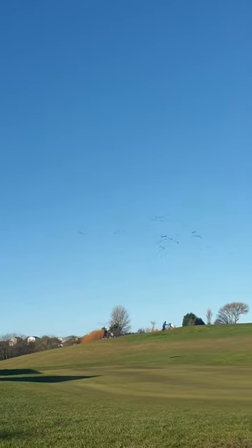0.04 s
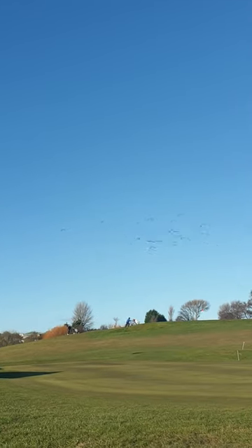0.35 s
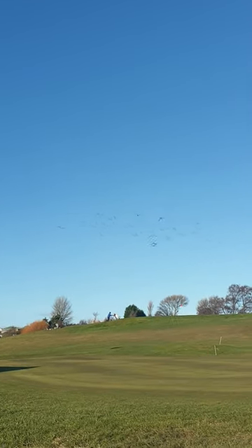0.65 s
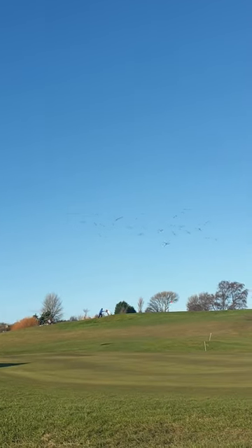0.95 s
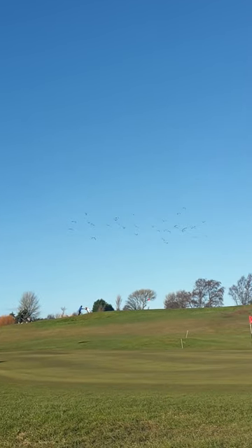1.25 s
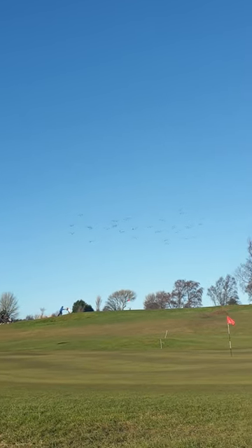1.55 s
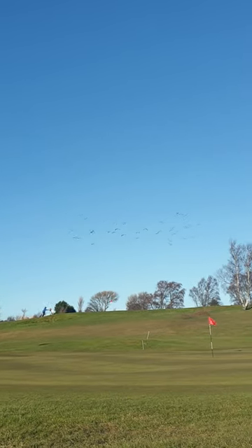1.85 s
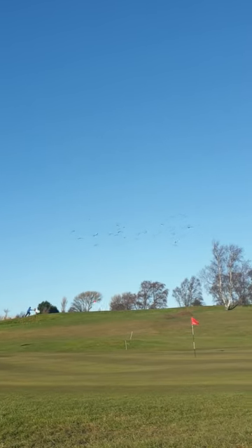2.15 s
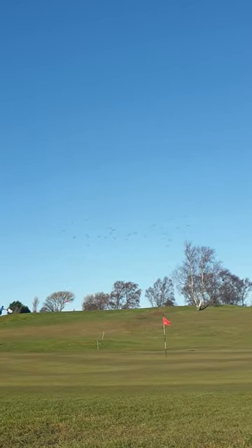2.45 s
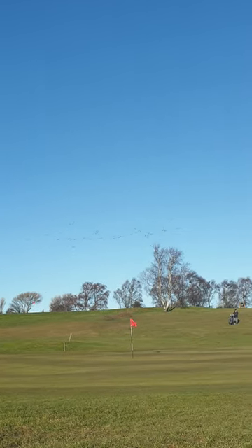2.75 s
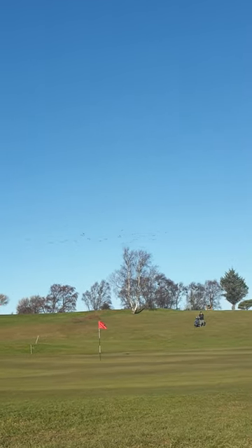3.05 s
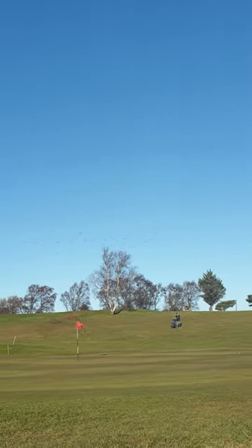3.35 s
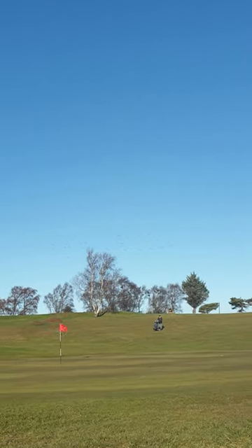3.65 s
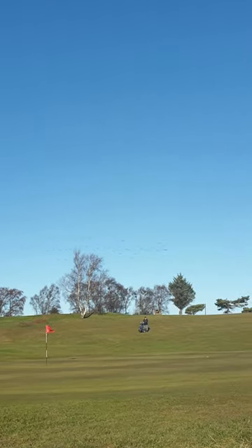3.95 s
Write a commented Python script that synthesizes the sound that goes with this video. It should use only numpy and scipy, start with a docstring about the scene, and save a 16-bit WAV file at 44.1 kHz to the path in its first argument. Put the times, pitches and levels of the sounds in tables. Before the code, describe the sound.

A shorebird gives one short, clear piping whistle late on, over open grass. Throughout, uneven wind rumbles and thumps on the microphone, with faint distant chirps before the call and a stronger gust after it.

```python
"""From the start, wind over open grass buffets two microphone openings, each in its own way, while
far birds chirp faintly over a thin hiss and a faint whine. Now and then a swirl of air thumps a
microphone. Near three seconds an oystercatcher gives one clear piping whistle: a soft low lead-in,
a leap to a held note, a drop. A dull echo comes back from far trees.
Near the end the wind peaks in a gust."""
import sys
import numpy as np
from scipy import signal
from scipy.fft import rfft, irfft
from scipy.io import wavfile
from scipy.ndimage import uniform_filter1d

SR = 44100
rng = np.random.default_rng(int(sys.argv[2]) if len(sys.argv) > 2 else 0)


def generate_wav(sig):
    """Save sig (samples, or channels by samples) to the path in sys.argv[1] as 16-bit PCM at SR."""
    pcm = np.round(np.clip(np.atleast_2d(sig).T, -1, 1) * 32767).astype(np.int16)
    wavfile.write(sys.argv[1], SR, pcm)


N = 176400
T = np.arange(N) / SR
HZ = np.fft.rfftfreq(N, 1 / SR)

# The oystercatcher's tune. Each row: time in seconds, base pitch in Hz, base level in dB.
WHISTLE_TUNE = [(2.82, 2110, -76), (2.86, 1950, -71), (2.925, 1905, -73.5), (2.943, 2066, -65),
                (2.954, 2510, -61), (2.962, 3360, -57), (2.975, 3430, -57.5), (2.992, 3490, -52.5),
                (3.025, 3501, -50), (3.06, 3470, -49), (3.088, 3435, -53), (3.098, 3365, -52),
                (3.106, 3410, -54), (3.115, 3350, -50), (3.122, 2920, -58), (3.129, 2260, -63),
                (3.14, 1960, -81)]


def amp(db):
    """Turns decibels into a number to multiply by."""
    return 10 ** (np.asarray(db) / 20)


def unit(x):
    """Scales a signal to an average (rms) size of 1."""
    return x / np.sqrt(np.mean(x ** 2) + 1e-20)


def curve(table, t):
    """Reads a table at times t, joining its rows with straight lines."""
    at, *columns = np.transpose(table)
    return np.array([np.interp(t, at, c) for c in columns])


def colour(table, hz):
    """Reads a table of dB as gains, joining its rows on a scale of octaves."""
    at, *columns = np.transpose(table)
    return amp([np.interp(np.log(hz + 1), np.log(at + 1), c) for c in columns])


def filtered(x, gain):
    """Turns each frequency up or down by gain(hz)."""
    size = x.shape[-1]
    return irfft(rfft(x) * gain(np.fft.rfftfreq(size, 1 / SR)), size)


def noise(gain):
    """Noise with the given gain at each frequency."""
    return irfft(rfft(rng.standard_normal(N)) * gain, N)


def wander(rate_hz, size=N):
    """A smooth random wobble, mostly slower than rate_hz."""
    return unit(filtered(rng.standard_normal(size), lambda hz: 1 / (1 + (hz / rate_hz) ** 4)))


def placed(start, sound):
    """Puts a short stereo sound at its time in the scene."""
    return np.pad(sound, ((0, 0), (round(start * SR), N)))[:, :N]


def scatter(x, delay_s, rise_s, fade_s, level_db):
    """A blurred outdoor echo, different in each ear, that falls 60 dB in fade_s."""
    t = np.maximum(T[:SR] - delay_s, 0)
    tails = rng.standard_normal((2, SR)) * (1 - np.exp(-t / rise_s)) * np.exp(-np.log(1000) * t / fade_s)
    tails /= np.linalg.norm(tails, axis=1, keepdims=True)
    return amp(level_db) * signal.fftconvolve(x, tails, axes=1)[:, :N]


def wind(gusts):
    """Churning air at one microphone: a lumpy rumble, and a flutter that brightens in gusts."""
    # The tone of three parts of the wind. Each row: frequency in Hz, relative level in dB.
    rumble_tone = [(10, -31.5), (28, -15), (45, -2), (70, 3.5), (110, -2), (170, -8.5), (240, -16.5),
                   (400, -44), (900, -90.5)]
    flutter_tone = [(100, -19.5), (190, 0), (260, 1.5), (400, -1.5), (490, -13.5), (620, -23), (760, -29.5),
                    (1200, -51.5), (3000, -87.5)]
    gale_tone = [(300, -34.5), (620, -18), (760, -29.5), (1000, -34), (1300, -46), (1700, -59.5),
                 (3000, -78.5), (8000, -100)]
    rumble_db, flutter_db = curve(gusts, T)
    rumble_trim_db, flutter_trim_db, gale_from_db = -1.53, -1.76, -37
    frames = dict(nperseg=512, noverlap=384)
    hz, t, spectrum = signal.stft(rng.standard_normal(N), SR, **frames)
    # A stronger gust adds smaller swirls, which sound higher.
    gale = amp(np.interp(t, T, flutter_db) - gale_from_db)
    shape = np.hypot(colour(flutter_tone, hz).T, colour(gale_tone, hz).T * gale)
    shape /= np.linalg.norm(shape, axis=0)
    flutter = unit(signal.istft(spectrum * shape, **frames)[1][:N])
    rumble = unit(noise(colour(rumble_tone, HZ)[0]))
    lumps = amp(4 * wander(rate_hz=32))
    return lumps * (rumble * amp(rumble_db + rumble_trim_db) + flutter * amp(flutter_db + flutter_trim_db))


def hiss():
    """Still air and the microphones make a thin, slightly patchy hiss."""
    # The tone of the hiss. Each row: frequency in Hz, left and right level in dB per Hz.
    hiss_tone = [(30, -93.5, -86.5), (200, -102, -103), (620, -109, -114), (1510, -110, -117),
                 (2260, -112, -119), (3130, -118, -120.5), (4840, -123, -124), (7750, -131, -131),
                 (9030, -124, -131), (10870, -119.5, -121.5), (15500, -119.5, -120)]
    steady = np.array([noise(gain) for gain in colour(hiss_tone, HZ)]) * np.sqrt(SR / 2)
    spectrum = signal.stft(steady, nperseg=512)[2]
    patches = uniform_filter1d(rng.standard_normal(spectrum.shape), size=6, axis=1)  # blur in frequency
    patches_db = 1.66 * unit(uniform_filter1d(patches, size=8, axis=2))  # blur in time
    return signal.istft(spectrum * amp(patches_db), nperseg=512)[1][:, :N]


def whine(pitch_hz=2382, width_hz=4.7, left_db=-89, right_db=-98):
    """A very narrow band of noise, heard as a faint wavering note."""
    band = 1 / (1 + ((HZ - pitch_hz) / width_hz) ** 2)
    return np.array([amp(side_db) * unit(noise(band)) for side_db in (left_db, right_db)])


def far_birds(wobble=0.0098, right_db=-12.5):
    """Thin gliding chirps, blurred by distance."""
    # The chirps. Each row: start and length in seconds, first and last pitch in Hz, level in dB.
    chirps = [(0.0, 0.075, 3650, 3800, -79), (0.024, .17, 3780, 3410, -85), (0.475, 0.069, 4050, 2810, -82),
              (1.315, 0.083, 4370, 3150, -84), (1.868, .1, 4700, 2780, -81.5),
              (1.888, 0.055, 4860, 4300, -81.5), (2.093, .05, 4500, 3480, -85)]
    out = np.zeros(N)
    for start, length, first_hz, last_hz, level_db in chirps:
        progress = np.clip((T - start) / length, 0, 1)
        pitch = (first_hz + (last_hz - first_hz) * progress) * (1 + wobble * wander(rate_hz=129))
        phase = 2 * np.pi * np.cumsum(pitch) / SR
        out += amp(level_db) * np.sqrt(abs(np.sin(np.pi * progress))) * np.sin(phase)
    out = out * amp([[0], [right_db]])
    return out + scatter(out, delay_s=.0025, rise_s=.0025, fade_s=.15, level_db=-4.5)


def thumps():
    """Each swirl of air hits the microphones as one push of pressure between two dips."""
    # The swirls. Each row: time and width in seconds, left and right level in dB.
    swirls = [(0.241, 0.0026, -25, -41), (0.344, 0.0033, -23.5, -22), (0.411, .0014, -21.5, -37.5),
              (.941, 0.0019, -26, -27.5), (2.177, 0.0013, -38, -21.5), (2.235, 0.0011, -28, -35),
              (2.278, 0.0013, -25.5, -28.5), (3.655, 0.0035, -40, -19.5), (3.725, 0.00074, -44, -17),
              (3.776, 0.0018, -15, -15.5)]
    out = np.zeros((2, N))
    for at, width, left_db, right_db in swirls:
        offset = (T - at) / width
        out += amp([[left_db], [right_db]]) * (1 - offset ** 2) / (1 + offset ** 2 / 2) ** 3
    return out


def whistle(pitch_factor, wobble=.0012, wobble_hz=153, flicker_db=1.8, edge_s=.006):
    """A clean tone and four overtones, each louder where the bird's throat and bill ring."""
    # How throat and bill shape the tone. Each row: frequency in Hz, left and right gain in dB.
    throat = [(1900, -11.5, -15.5), (2900, -3, -14), (3450, 1, -15.5), (4000, -3, -24), (4960, -5, -25),
              (5800, -23, -28), (6330, -7, -28), (7440, -2.5, -20), (7600, -17, -26), (8700, 12, -21),
              (8900, 0, -42), (10300, 0, -14), (12100, 8, -14), (13900, -33, -34)]
    drop_db_per_octave, fast_slide_hz_per_s = 7, 270000
    start, end = WHISTLE_TUNE[0][0], WHISTLE_TUNE[-1][0]
    t, out = start + T[:SR // 2], 0
    pitch, level_db = curve(WHISTLE_TUNE, t)
    slide = uniform_filter1d(abs(np.gradient(pitch, t)), size=200) / fast_slide_hz_per_s
    pitch = pitch * (1 + wobble * wander(wobble_hz, size=len(t)))
    phase = 2 * np.pi * pitch_factor * np.cumsum(pitch) / SR
    level = amp(level_db) * np.clip(np.minimum(t - start, end - t) / edge_s, 0, 1)
    for k in range(1, 6):
        shimmer_db = flicker_db * np.sqrt(k) * wander(wobble_hz / 2, size=len(t))
        strength = amp(shimmer_db - drop_db_per_octave * np.log2(k))
        strength /= 1 + (k - 1) * slide  # fast slides weaken the overtones
        out = out + colour(throat, k * pitch) * strength * np.sin(k * phase)
    return level * out


def oystercatcher(copies=8, pitch_spread=.065, treble_lift_db=10):
    """The whistle, a hoarse halo of scattered, slightly out-of-tune copies, then the far echo."""
    start = WHISTLE_TUNE[0][0]
    halo = sum(scatter(whistle(factor), delay_s=.006, rise_s=.003, fade_s=.32, level_db=-21.5)
               for factor in 1 + pitch_spread * np.linspace(-1.2, 1, copies))
    halo = placed(start, halo / np.sqrt(copies))
    halo = filtered(halo, lambda hz: amp(np.interp(hz, [3500, 10500], [0, treble_lift_db])))
    return placed(start, whistle(pitch_factor=.99)) + halo + placed(start, tree_echo())


def tree_echo(pitch_factor=1.025, pitch_spread=.032, dull_above_hz=4200):
    """Far trees send the whistle back dull and a little higher, as from a bird in flight."""
    far = sum(whistle(pitch_factor + pitch_spread * offset) for offset in (-1, 0, 1))
    dull = filtered(far, lambda hz: 1 / (1 + (hz / dull_above_hz) ** 8))
    return scatter(dull, delay_s=.13, rise_s=.012, fade_s=1.3, level_db=-26)


def scene():
    """Birds, wind and still air together."""
    # Wind strength on each side. Each row: time in seconds, rumble and flutter in dB before trimming.
    left_gusts = [(0.0, -52, -42), (0.08, -29.5, -51), (0.14, -47.5, -51), (0.24, -36.5, -45.5),
                  (0.32, -34.5, -46), (0.41, -30, -42), (0.52, -47, -51.5), (0.6, -36, -54),
                  (0.66, -45, -56), (0.69, -35, -45), (0.75, -60, -55), (0.87, -36, -38.5),
                  (0.91, -74, -52.5), (0.95, -30, -37.5), (1.01, -79, -55), (1.22, -37, -57.5),
                  (1.37, -46.5, -53.5), (1.47, -66, -72.5), (1.57, -43.5, -59), (1.63, -42.5, -54.5),
                  (1.83, -52, -67.5), (1.89, -39.5, -57), (2.04, -39.5, -51.5), (2.12, -40.5, -50.5),
                  (2.17, -30, -41.5), (2.32, -47.5, -52), (2.42, -38.5, -57.5), (2.52, -49.5, -60),
                  (2.69, -40.5, -58), (2.77, -60, -73.5), (2.8, -47.5, -60.5), (2.85, -90, -77),
                  (2.89, -47, -60.5), (3.34, -66.5, -91), (3.49, -35.5, -42.5), (3.58, -40.5, -52),
                  (3.65, -35, -32), (3.7, -39, -38), (3.72, -28.5, -28.5), (3.78, -26, -36),
                  (3.87, -47, -50.5), (4.0, -40.5, -62)]
    right_gusts = [(0.0, -27, -38), (0.17, -44.5, -54.5), (0.24, -35.5, -45), (0.45, -31, -40.5),
                   (0.49, -41.5, -50), (0.56, -44, -54.5), (0.67, -43, -59), (0.69, -59, -49.5),
                   (0.74, -35.5, -56), (0.8, -60, -42.5), (0.84, -51, -50), (0.97, -36.5, -43.5),
                   (1.01, -46, -62), (1.15, -41.5, -56.5), (1.22, -64, -54), (1.26, -34, -52),
                   (1.55, -72.5, -66.5), (1.61, -33.5, -45), (1.83, -67.5, -73), (1.89, -48, -44.5),
                   (1.97, -58, -61.5), (2.03, -40, -49.5), (2.35, -41.5, -47), (2.38, -68, -59.5),
                   (2.43, -35.5, -53.5), (2.58, -56, -68.5), (2.68, -37, -64.5), (2.78, -80, -74),
                   (2.81, -59.5, -81.5), (2.97, -47, -61), (3.01, -61, -75.5), (3.05, -45.5, -63),
                   (3.08, -59.5, -78), (3.22, -54, -82), (3.33, -102, -74), (3.42, -52, -60),
                   (3.6, -30.5, -45.5), (3.75, -40.5, -35.5), (3.77, -44, -25.5), (3.88, -43.5, -49.5),
                   (3.89, -73, -54.5), (4.0, -44, -61)]
    birds = oystercatcher() + far_birds()
    return birds + np.array([wind(left_gusts), wind(right_gusts)]) + thumps() + hiss() + whine()


def record(dry, cutoff_hz=15720):
    """The recorder sharply cuts off the highest treble."""
    low_pass = signal.firwin(1023, cutoff_hz, window=("kaiser", 9), fs=SR)
    return signal.oaconvolve(dry, low_pass[None], "same")


dry = scene()
out = record(dry)
generate_wav(out)
```